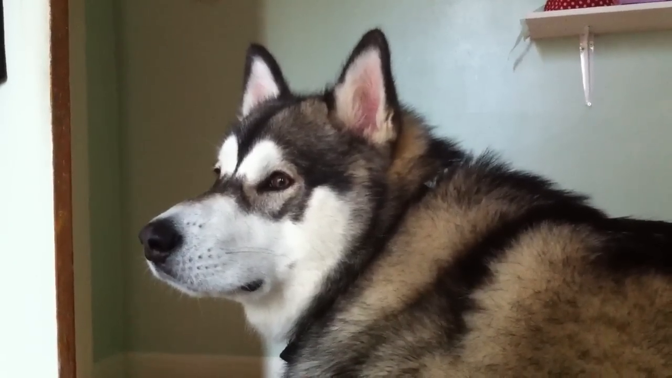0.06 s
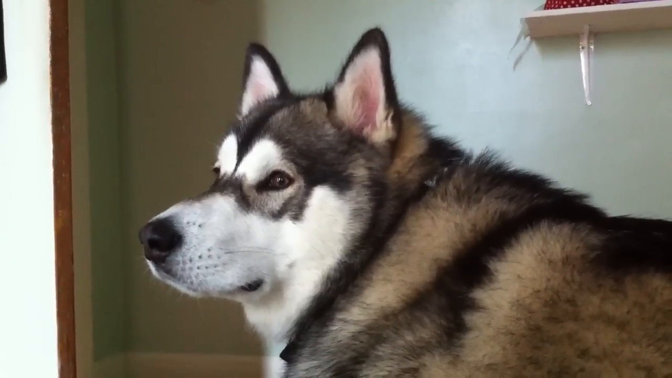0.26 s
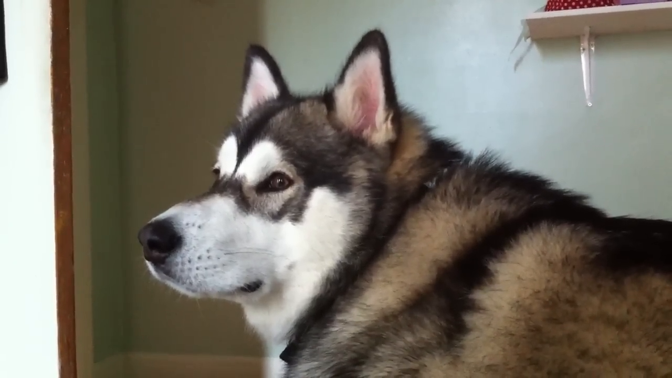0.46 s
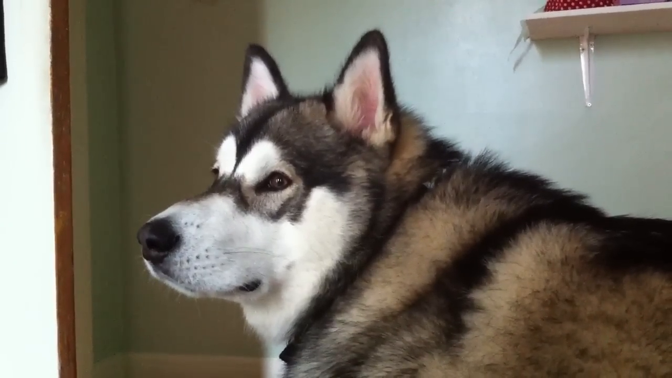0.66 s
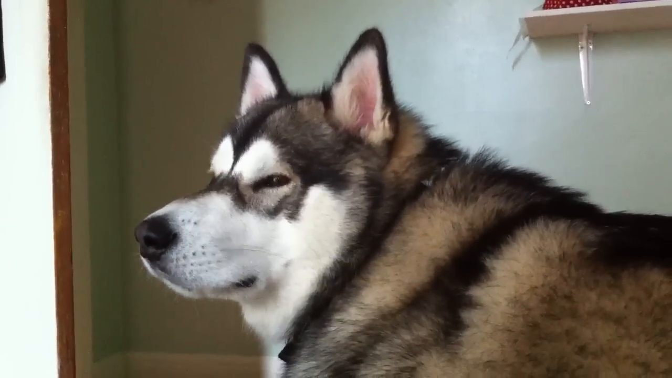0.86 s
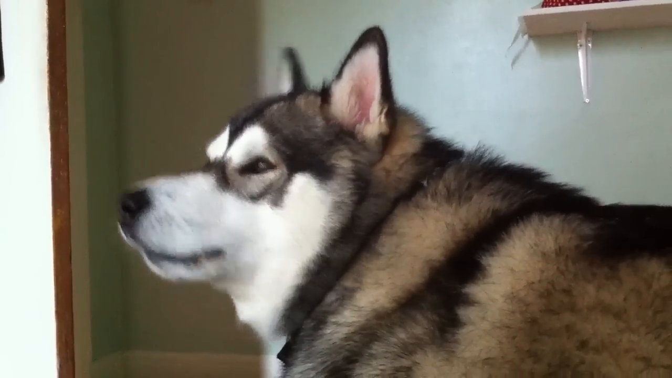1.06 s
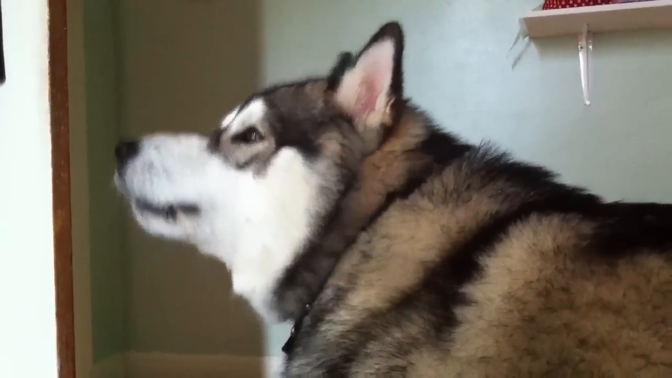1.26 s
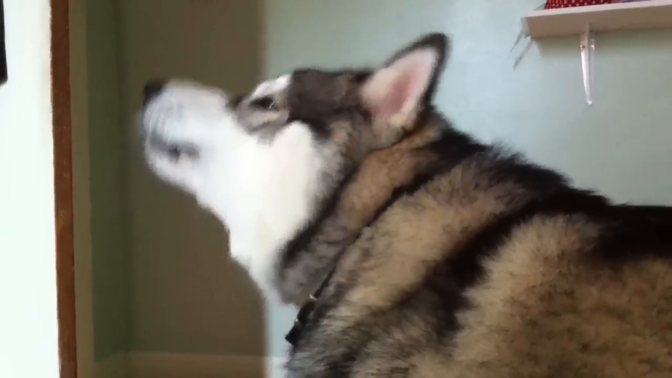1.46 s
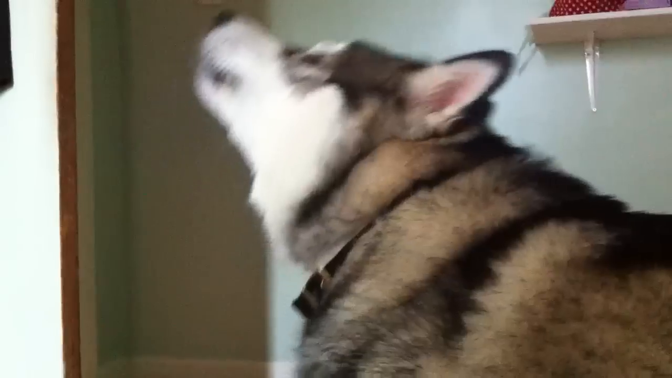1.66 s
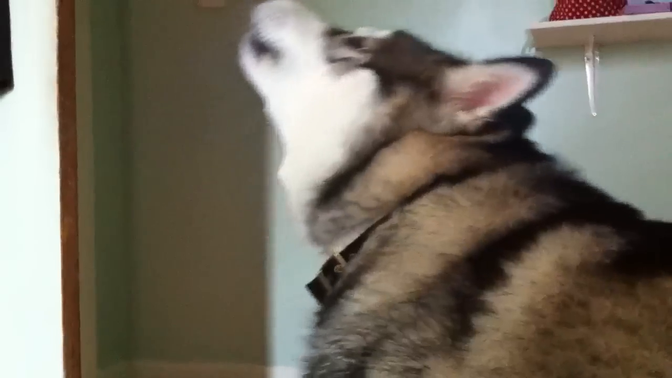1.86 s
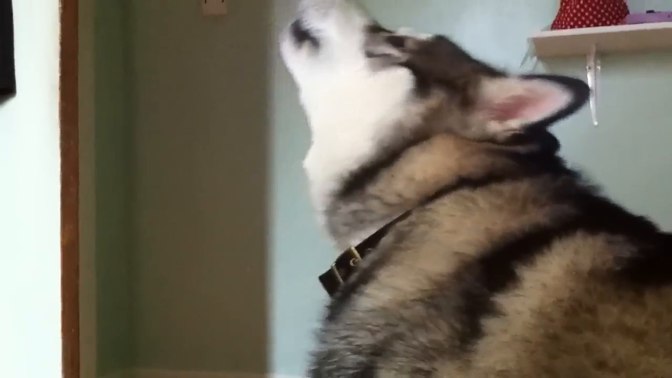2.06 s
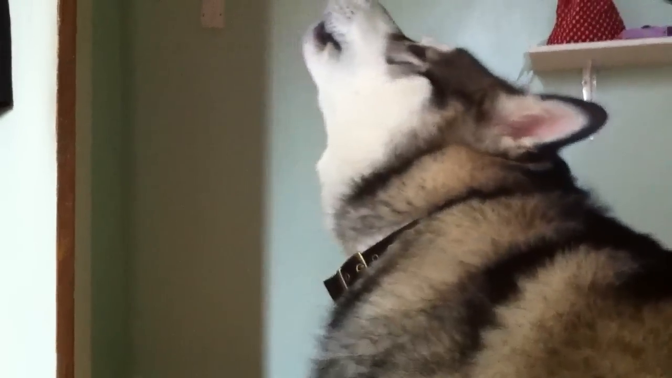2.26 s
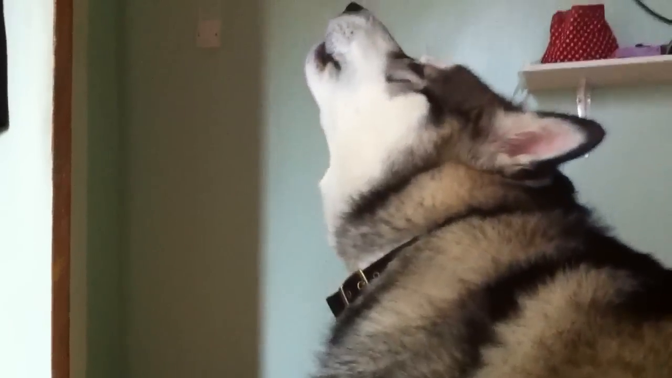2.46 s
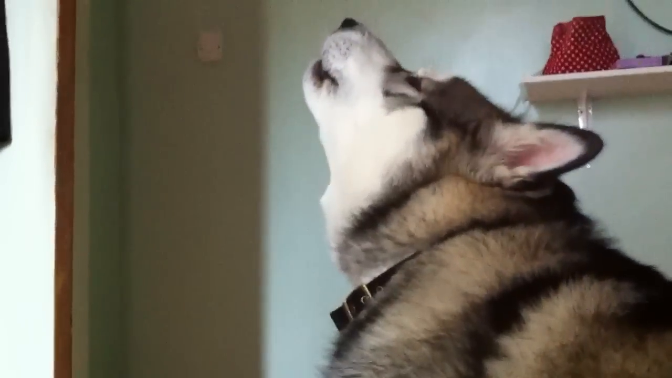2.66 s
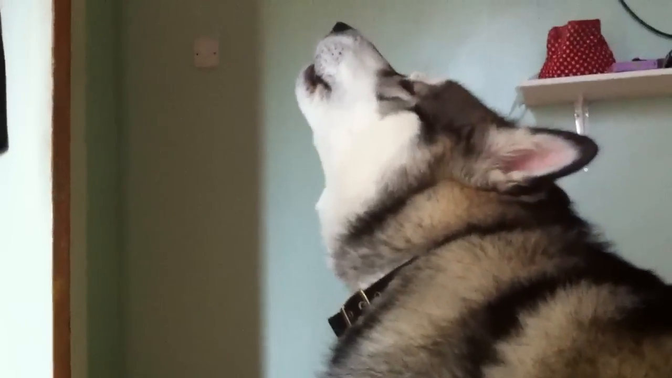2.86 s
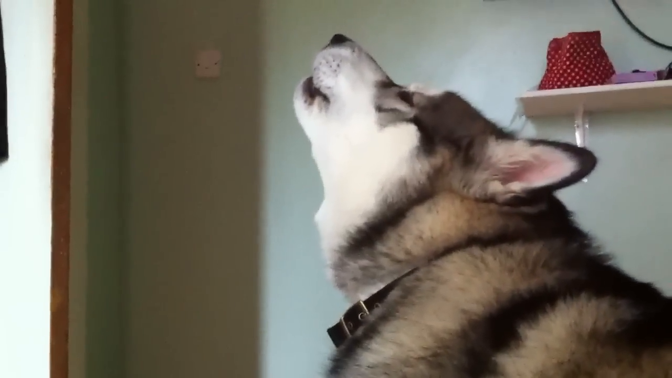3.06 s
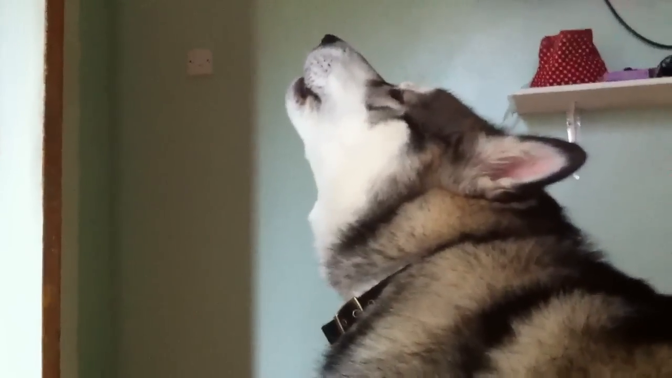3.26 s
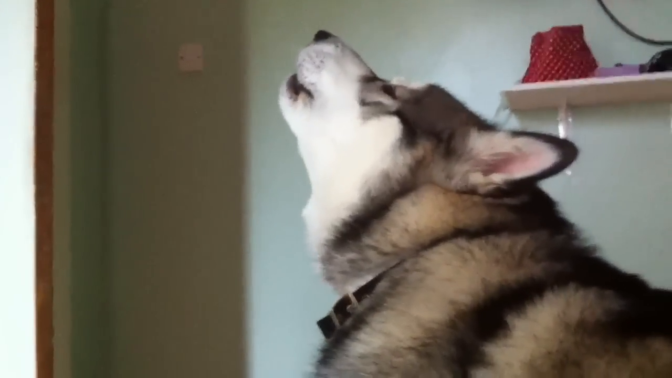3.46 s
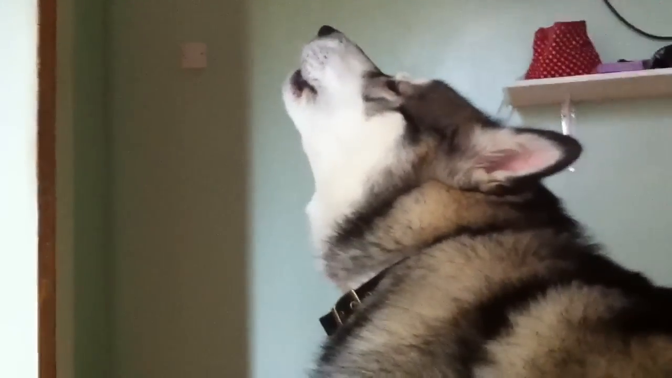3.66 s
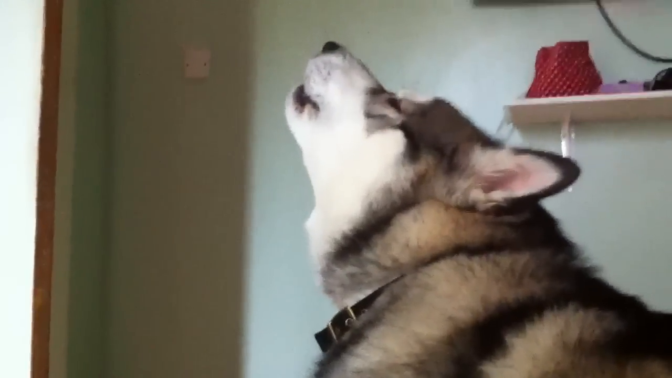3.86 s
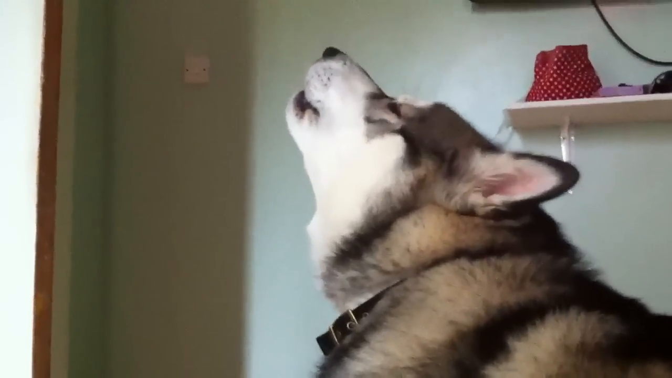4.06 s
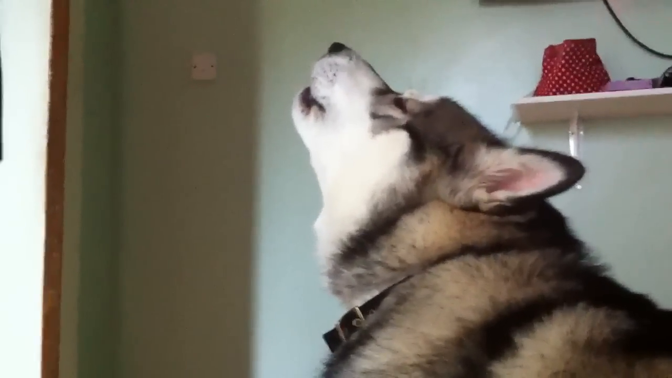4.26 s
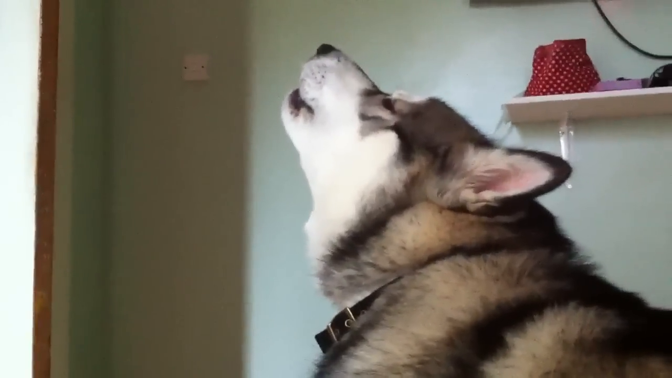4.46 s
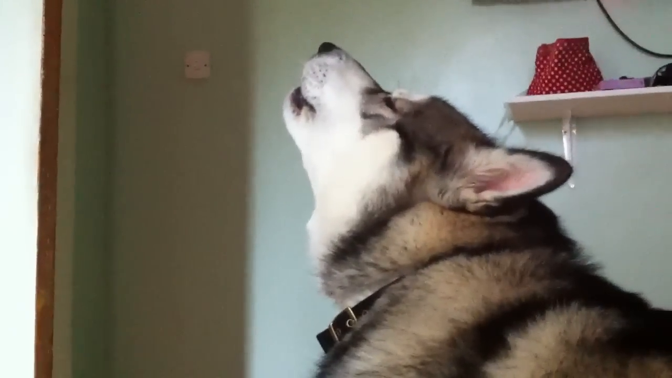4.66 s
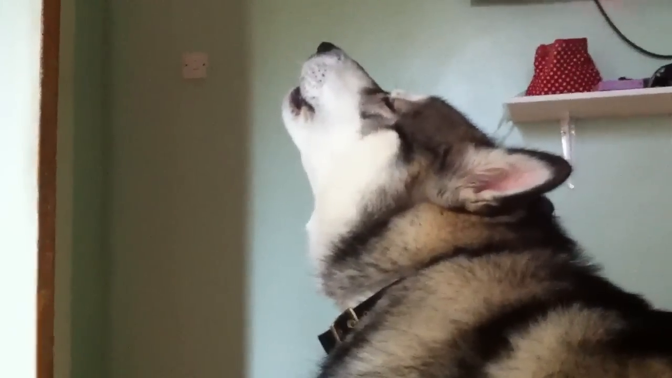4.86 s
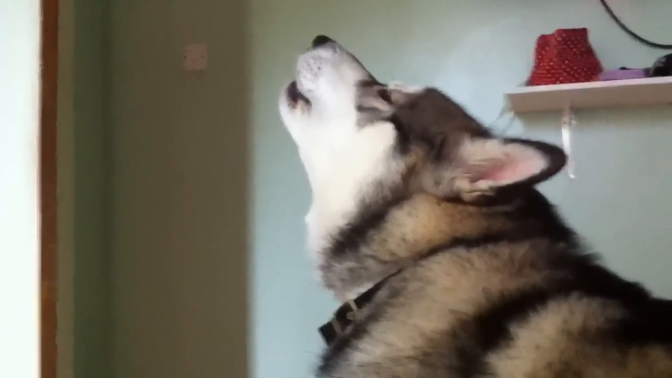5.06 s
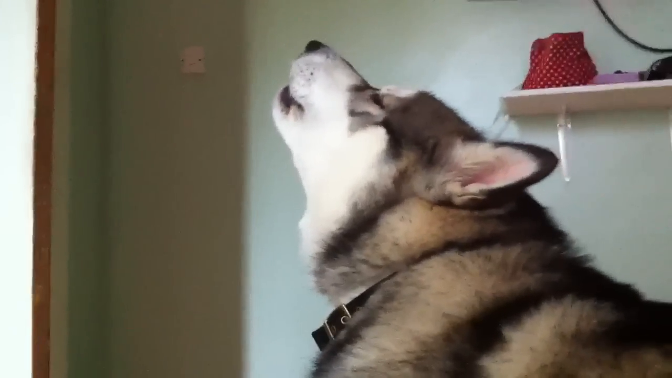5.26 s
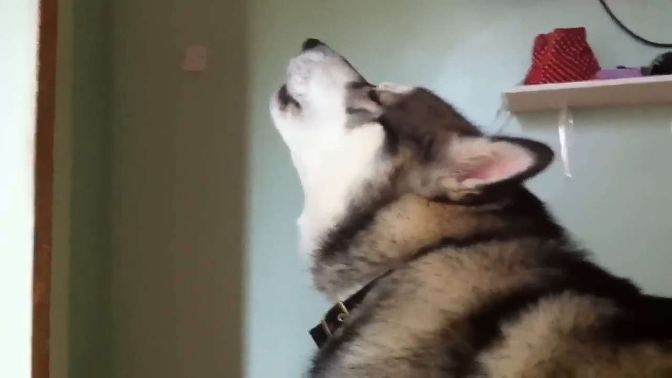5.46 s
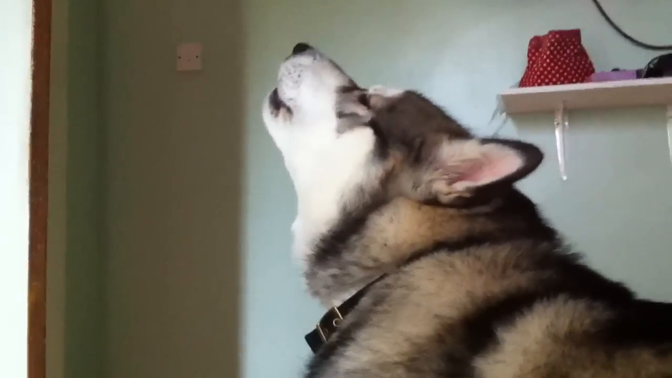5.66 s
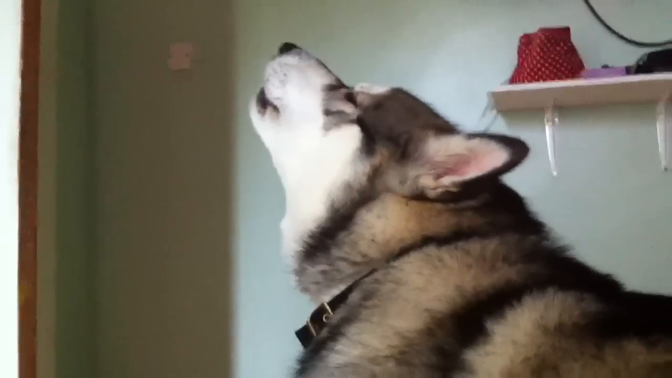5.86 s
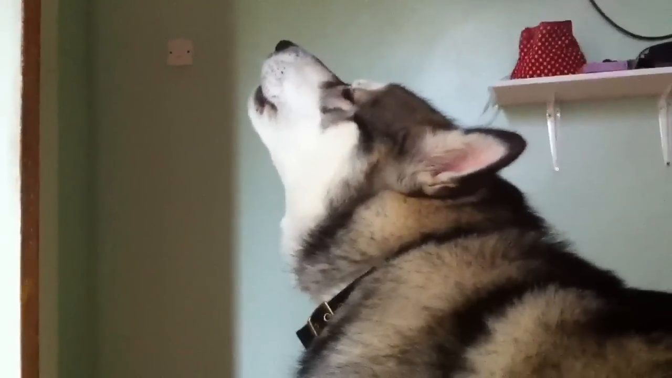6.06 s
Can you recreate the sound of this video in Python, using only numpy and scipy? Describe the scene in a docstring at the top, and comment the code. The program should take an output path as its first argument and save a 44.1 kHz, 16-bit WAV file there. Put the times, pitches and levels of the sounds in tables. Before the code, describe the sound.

Close by in a small room, a big dog chuffs softly and howls once, high at first, then lower and hoarse, sinking away.

```python
"""A large dog, close by in a small, softly humming room, snuffles and gives a low chuff: four slack flaps
of the throat. It lifts its head and howls once. The howl starts high and pure, as its vocal folds swing
evenly, then turns breathy and cracks down to a lower note. There the folds repeat only every third cycle
and keep breaking into a rasp, while the dog presses ever harder and its wet mouth clicks faintly.
At last the voice clears, sinks and fades away."""
import sys
import numpy as np
from scipy import signal
from scipy.fft import rfft, irfft, next_fast_len
from scipy.io import wavfile
from scipy.ndimage import uniform_filter1d

SR = 44100
rng = np.random.default_rng(int(sys.argv[2]) if len(sys.argv) > 2 else 0)


def store_wav(level_fs):
    """Save 16-bit WAV to argv[1]."""
    pcm = np.round(np.clip(np.atleast_2d(level_fs), -1, 1) * 32767)
    wavfile.write(sys.argv[1], SR, pcm.T.astype(np.int16))


N = 269451
TIME = np.arange(N) / SR

# the howl starts high and swells: t/s, pitch/Hz, level/dB
HIGH_NOTE = [(1.482, 566, -32.5), (1.507, 633, -23), (1.541, 602.6, -22), (1.591, 613.9, -21.5),
             (1.656, 589.4, -21.5), (1.736, 576.2, -18), (1.886, 555.6, -15.5), (2.05, 551.8, -14),
             (2.365, 567.1, -8.5), (2.424, 563.5, -9), (2.469, 569.3, -10.5)]
# after the break it settles on a lower note: t/s, pitch/Hz, level/dB
LOW_NOTE = [(2.49, 468, -11), (2.57, 456, -11.5), (2.615, 428, -11), (2.66, 423, -15.5), (2.75, 421, -14.5),
            (2.85, 414, -10), (2.94, 409.5, -11.5), (3.7, 409, -11), (4.2, 405.5, -9.7), (4.52, 405.5, -10)]
# then it sinks away: t/s, pitch/Hz, level/dB
FALLING_NOTE = [(4.555, 406.5, -10.5), (4.59, 414.1, -9.5), (4.929, 392.9, -11), (5.263, 389.1, -14),
                (5.333, 379.6, -16.5), (5.647, 366.5, -18.5), (5.712, 354.3, -24.5), (5.907, 348.8, -22.5),
                (5.971, 338, -32), (6.026, 336.4, -35), (6.096, 331.3, -40)]
# tone of each stage, relative to the effort: start/s, harmonics 2 to 5/dB (one each), overtones/dB
TIMBRE = [(1.47, -16, -34, -45, -54, -36), (1.55, -19.5, -26, -50.5, -45.5, -39),
          (2.12, -30, -34, -46.5, -43.5, -40.5), (2.49, -17, -34.5, -46.5, -47.5, -45),
          (2.62, -16.5, -27, -39, -39.5, -39), (4.55, -16.5, -26, -37.5, -43.5, -37),
          (5.31, -22, -14, -34, -39.5, -34.5), (5.66, -19, -23, -47.5, -42.5, -41),
          (5.95, -12.5, -32, -42, -31, -33)]
# rasp of the folds and air rushing past them, relative to the effort: start/s, rasp/dB, air/dB
TEXTURE = [(1.47, -29.5, -34.5), (1.6, -43, -49), (2.07, -32, -40), (2.49, -19, -40), (2.64, -25, -38),
           (2.99, -17, -41.5), (3.77, -20.5, -43.5), (3.92, -34, -43), (4.58, -44, -49), (5.32, -45, -55)]
# spells in which the folds repeat every second cycle: start/s, end/s, level/dB
DOUBLING = [(2.32, 2.48, -34.5), (2.98, 3.85, -29.5)]
# spell in which they repeat every third cycle: start/s, end/s, level/dB
TRIPLING = [(2.62, 4.57, -10.5)]
# extra tones in that spell: multiple of a third of the pitch, relative level/dB
SIDE_TONES = [(1, -52), (2, -24.5), (4, -32), (5, -19), (7, -28.5), (8, -16.5), (10, -47.5), (11, -36),
              (13, -51), (14, -31.5)]
# cracks, where the folds lose their rhythm: t/s, level/dB
CRACKS = [(2.493, -13), (2.522, -12.5), (2.54, -16), (2.565, -18), (2.585, -12.5), (2.613, -17),
          (3.04, -15.5), (3.103, -15), (3.201, -18), (3.272, -19.5), (3.341, -13), (3.417, -19),
          (3.455, -19), (3.522, -13), (3.577, -16.5), (3.6, -13), (3.661, -15.5), (3.748, -14)]
# a crack rings the two lowest resonances of the mouth: f/Hz, relative level/dB
CRACK_COLOUR = [(60, -64.5), (130, -26), (220, -30.5), (290, -4), (460, 4), (620, 3), (790, -9.5),
                (1020, -3.5), (1200, -33), (1600, -40.5), (2030, -22), (2500, -61.5), (5000, -65.5)]
# the throat as the rasp rings it: f/Hz, relative level/dB
RASP_COLOUR = [(70, -58), (135, -25), (220, -28), (280, -8.5), (450, -3.5), (620, -5.5), (780, -13),
               (1060, -8.5), (1200, -20.5), (1500, -28), (2030, -19), (2450, -60.5), (2950, -42.5),
               (3220, -16.5), (3550, -43), (5000, -59)]
# resonances of throat and muzzle: f/Hz, width/Hz, gain when narrow/dB, gain when open/dB
THROAT = [(2090, 130, -7.5, 3.5), (2740, 140, 1.5, -18.5), (3181, 220, -12, 0.5), (4800, 300, -8.5, -33.5),
          (5230, 450, -14.5, -14), (6084, 490, -4, -6.5), (6372, 41, -9, 5.5), (8250, 190, -10, -15),
          (9270, 200, -6.5, -28.5), (13200, 6800, -25, -23.5)]
# the throat settles from narrow to open: t/s, opening from 0 to 1
OPENING = [(2.48, 0.02), (2.55, 0.3), (2.93, 0.5), (3.02, 0.99)]
# air through the narrow throat: f/Hz, relative level/dB
NARROW_AIR_COLOUR = [(80, -25.5), (900, -6.5), (2050, 7.5), (2550, -4.5), (3400, 2.5), (3900, -4.5),
                     (4600, -6), (5700, -9.5), (6150, 3.5), (7500, -14), (8500, 3.5), (9900, -11.5),
                     (13000, -10), (15700, -22)]
# air through the open throat: f/Hz, relative level/dB
OPEN_AIR_COLOUR = [(80, -23), (1200, 6.5), (2050, 14.5), (2550, -3.5), (2950, -0.5), (3200, 12.5),
                   (3700, -4.5), (5100, 1), (5700, -10), (6250, 7), (7400, -9.5), (8400, 5.5),
                   (9900, -10.5), (14000, 5.5), (15800, -8)]
# flaps of the throat in the chuff: t/s, level/dB
CHUFF_FLAPS = [(1.129, -30), (1.145, -35), (1.158, -29.5), (1.173, -33)]
# the low thud of those flaps: f/Hz, relative level/dB
CHUFF_COLOUR = [(40, -42.5), (85, -23.5), (150, 1), (260, 1.5), (470, 1.5), (690, -21), (1020, -1.5),
                (1250, -15), (2000, -24), (3800, -22), (6000, -33), (6900, -33), (7600, -37), (15000, -39)]
# puffs through the nose around the chuff: start/s, end/s, level/dB
SNUFFLES = [(.965, .99, -65), (1.04, 1.2, -57), (1.32, 1.36, -65.5)]
# the hiss of those puffs: f/Hz, relative level/dB
SNUFFLE_COLOUR = [(59, -59), (100, -27), (297, -1.5), (831, -1.5), (1290, -10), (1430, -3), (2180, -15),
                  (3390, -10), (5370, -15.5), (15000, -18)]
# wet clicks of tongue and lips: t/s, level/dB
CLICKS = [(1.057, -44), (3.082, -39), (3.28, -39), (4.078, -50), (4.761, -42.5)]
# the bright snap of those clicks: f/Hz, relative level/dB
CLICK_COLOUR = [(1000, -25), (5000, -15.5), (9000, -2), (12000, 3), (15500, -6)]
# echoes from the nearest surfaces: delay/ms, gain
ECHOES = [(5.88, 0.34), (7.08, 0.17), (7.95, 0.41), (11.83, 0.22), (17.0, 0.2), (20.89, 0.19)]
# the room's steady hum and hiss: f/Hz, relative level/dB
ROOM_COLOUR = [(18, -76.5), (30, -36.5), (85, -37), (140, -15.5), (182, -16.5), (219, -2), (249, -17),
               (389, -18.5), (2360, -26), (3230, -27), (5590, -27), (6210, -30.5), (7650, -29.5),
               (12300, -30.5), (15500, -26)]

BREAK_S = 2.495  # the voice drops to its lower note
TOP_HZ = 15750  # upper edge of the sound
RING_DB, RING_PRESS_DB = -15, 18  # mouth's ring near 1 and 2 kHz when slack, and its rise at full push
FIFTH_PRESS_DB, TREBLE_PRESS_DB = 7, 5  # rise of the fifth harmonic and the overtones at full push
DULL_FROM_S, DULL_DB_PER_S = 4.86, 24  # the treble fades as the howl runs out
FLUTTER_DB, FLUTTER_PER_S = 2, 12  # the low harmonics waver in strength, each on its own


def howl(jitter=0.00096, rough_jitter=0.16, crack_kick=.03, shimmer=7.1, effort_s=0.3, low_cut_hz=115):
    """One long call, all riding on the swing of the vocal folds. Returns its body and its treble."""
    pitch, level_db = curves([*HIGH_NOTE, *LOW_NOTE, *FALLING_NOTE])
    effort_db = uniform_filter1d(level_db, int(effort_s * SR))  # effort is the smoothed level
    *harmonics_db, overtones_db = effort_db + np.array(stages(TIMBRE, glide_s=.045))
    rasp_db, air_db = effort_db + np.array(stages(TEXTURE, glide_s=.053))
    press = pressure()
    harmonics_db[-1] += FIFTH_PRESS_DB * press
    side_gain = spells(TRIPLING, attack_s=0.026, release_s=0.027)
    opening = np.clip(curves(OPENING)[0], 0, 1)
    hoarse = undb(rasp_db)
    burst, tone_share = cracks()
    roughness = np.hypot(hoarse, burst)
    # rougher folds hold their pitch less well, and each crack jerks it upward
    wobble = (jitter + rough_jitter * roughness) * wander(160)
    hz = pitch * (1 + wobble + crack_kick * (1 - tone_share))
    phase = 2 * np.pi * np.cumsum(hz) / SR
    # their swing wavers too, and falters more than it overshoots
    swing = tone_share * (1 + shimmer * hoarse * np.minimum(wander(70), .5))
    tone = undb(level_db) * np.sin(phase)
    for k, db in enumerate(harmonics_db, 2):
        tone += undb(db + FLUTTER_DB * wander(FLUTTER_PER_S)) * echo_gain(k * pitch) * np.sin(k * phase)
    growl = undertones(phase, side_gain, RING_DB + RING_PRESS_DB * press, roughness)
    body = swing * (np.sqrt(2) * tone + growl)
    body += hoarse * rasp(phase, RASP_COLOUR) + burst * rasp(phase, CRACK_COLOUR)
    # the mouth is too small to send out bass
    body = signal.sosfilt(signal.butter(3, low_cut_hz, "high", fs=SR, output="sos"), body)
    tripled = side_gain / side_gain.max()
    treble = undb(overtones_db + TREBLE_PRESS_DB * press) * overtones(phase, hz, tripled, opening, press)
    treble += undb(air_db) * breath(phase, opening, tripled)
    dulling = undb(-DULL_DB_PER_S * np.maximum(TIME - DULL_FROM_S, 0))
    onset = np.interp(TIME, [1.472, 1.492], [0, 1])
    return onset * body, onset * dulling * treble


def pressure(start_s=2.65, full_s=4.05, end_s=4.53, release_s=.06):
    """The push behind the voice, from 0 to 1: the dog presses ever harder, holds, then lets go."""
    return np.interp(TIME, [start_s, full_s, end_s, end_s + release_s], [0, 1, 1, 0])


def undertones(phase, side_gain, ring_db, roughness, slip=0.079, rough_slip=7.2):
    """Folds that repeat every second or third cycle add tones below and between the harmonics."""
    # after the break, half the pitch lies too low to carry
    halves = undb(-8.5) * (TIME < BREAK_S) * np.sin(phase / 2) + np.sin(1.5 * phase)
    # the rougher the voice, the more the three-cycle pattern slips
    slow_phase = (phase + (slip + rough_slip * roughness) * wander(45)) / 3
    thirds = 0
    for multiple, db in SIDE_TONES:
        boost_db = ring_db * (multiple in (8, 14))  # these two lie where the mouth rings
        thirds += undb(db + boost_db) * np.sin(multiple * slow_phase + rng.uniform(0, 2 * np.pi))
    return np.sqrt(2) * (spells(DOUBLING, attack_s=0.016, release_s=.02) * halves + side_gain * thirds)


def cracks(rise_s=0.0083, heal_s=.016, tone_loss=.75, dip_length_share=.65):
    """The folds lose their rhythm fast and regain it more slowly. Returns rasp gain and the tone left."""
    burst, tone_share = 0, 1
    for s, db in CRACKS:
        age = (TIME - s) / np.where(TIME < s, rise_s, heal_s)
        burst += undb(db) * np.exp(-age ** 2)
        tone_share *= 1 - tone_loss * np.exp(-(age / dip_length_share) ** 2)
    return burst, tone_share


def rasp(phase, points, scatter_cycles=.22, spread_db=5.5):
    """The folds clap shut with uneven timing and strength, and each clap rings the throat."""
    cycles = np.arange(int(phase[-1] / (2 * np.pi)))
    timing, strength = rng.standard_normal((len(cycles), 2)).T
    clap_at = np.interp(2 * np.pi * (cycles + scatter_cycles * timing), phase, np.arange(N))
    claps = np.bincount(clap_at.astype(int), undb(spread_db * strength), N)
    # only what strays from the even rhythm is rough
    even = 2 * np.mean(claps * np.cos(phase)) * np.cos(phase) + claps.mean()
    ring = colour(claps - even, points)
    # the folds can only swing so far, which evens out the loudness
    power = uniform_filter1d(uniform_filter1d(ring ** 2, size=400), size=400)
    return unit(ring / np.sqrt(power + 0.069))


def overtones(phase, hz, tripled, opening, press, side_db=-3, flutter_db=3):
    """The throat shapes harmonics 6 to 37; the three-cycle pattern adds a side tone under each."""
    sound, power = 0, 1e-9
    for k in range(6, 38):
        gain = throat(k * hz, opening) * whistle(k * hz, press)
        sound += gain * undb(flutter_db * wander(16)) * np.sin(k * phase + rng.uniform(0, 2 * np.pi))
        below = k - 1 / 3
        side_gain = tripled * undb(side_db) * throat(below * hz, opening) * whistle(below * hz, press)
        sound += side_gain * np.sin(below * phase + rng.uniform(0, 2 * np.pi))
        power += (gain ** 2 + side_gain ** 2) / 2
    return sound / np.sqrt(power)


def throat(hz, opening):
    """How well throat and muzzle pass a tone at hz, as they move from narrow to open."""
    grid = np.linspace(0, SR / 2, num=2048)
    narrow, wide = 0, 0
    for centre_hz, width_hz, narrow_db, open_db in THROAT:
        peak = (grid < TOP_HZ) / (1 + (2 * (grid - centre_hz) / width_hz) ** 2)
        narrow += undb(narrow_db) * peak
        wide += undb(open_db) * peak
    return (1 - opening) * np.interp(hz, grid, narrow) + opening * np.interp(hz, grid, wide)


def whistle(hz, press, centre_hz=6400, half_width_hz=450, boost_db=5):
    """Extra gain at hz from a throat resonance that sharpens under pressure."""
    return undb(boost_db * press / (1 + ((hz - centre_hz) / half_width_hz) ** 2))


def breath(phase, opening, tripled, pulse=0.5, throb=0.25):
    """Air escapes once a cycle, and throbs with the slower of the two folds."""
    narrow = undb(5.5) * (1 - opening) * noise(NARROW_AIR_COLOUR)
    wide = undb(4.0) * opening * noise(OPEN_AIR_COLOUR)
    slow_fold = np.cos(phase * 2 / 3)
    return (narrow + wide) * (1 + pulse * np.cos(phase) + throb * tripled * slow_fold)


def chuff(ring_s=0.0029, tail_s=0.021, tail_db=-11):
    """Four slack flaps of the throat, each trailing a puff of air."""
    puffs = np.zeros(N)
    for s, db in CHUFF_FLAPS:
        age = np.maximum(TIME - s, 0)
        puffs += undb(db) * (TIME > s) * (np.exp(-age / ring_s) + undb(tail_db) * np.exp(-age / tail_s))
    return colour(puffs * rng.standard_normal(N), CHUFF_COLOUR) * np.sqrt(np.mean(puffs ** 2))


def snuffle():
    """Short puffs of air hiss through the nose."""
    return spells(SNUFFLES, attack_s=0.022, release_s=.02) * noise(SNUFFLE_COLOUR)


def clicks(ring_s=.002):
    """Films of saliva snap in the open mouth."""
    snaps = sum(undb(db) * (TIME > s) * np.exp(-np.abs(TIME - s) / ring_s) for s, db in CLICKS)
    return snaps * noise(CLICK_COLOUR)


def echo_gain(hz):
    """Near echoes strengthen or weaken a harmonic as it glides."""
    return np.abs(1 + sum(gain * np.exp(-2j * np.pi * hz * ms / 1000) for ms, gain in ECHOES))


def room(x, wet_db, fade_s=0.33):
    """Near walls add a short wash of echoes that falls by 60 dB in fade_s."""
    age = TIME[:SR // 2]
    tail = rng.standard_normal(len(age)) * np.exp(-np.log(1000) * age / fade_s) * (age > .003)
    return x + undb(wet_db) * signal.fftconvolve(x, tail / np.linalg.norm(tail))[:N]


def room_tone(level_db=-64):
    """A faint, steady hum and hiss fills the room."""
    return undb(level_db) * noise(ROOM_COLOUR)


def undb(db):
    """Turn decibels into a gain."""
    return 10 ** (np.asarray(db) / 20)


def unit(x):
    """Scale to an average power of 1."""
    return x / np.sqrt(np.mean(x ** 2))


def curves(rows):
    """Join the rows with straight lines: one curve over time per column."""
    times, *columns = np.transpose(rows)
    return [np.interp(TIME, times, column) for column in columns]


def stages(rows, glide_s):
    """Hold each row until the next, then glide to it: one curve per column."""
    starts, *columns = np.transpose(rows)
    row_now = np.maximum(np.searchsorted(starts, TIME) - 1, 0)
    return [uniform_filter1d(column[row_now], int(glide_s * SR)) for column in columns]


def spells(rows, attack_s, release_s):
    """A gain that rises before each start, holds, and dies away after each end."""
    gain = 0
    for start, end, db in rows:
        rise = np.clip(1 + (TIME - start) / attack_s, 0, 1)
        gain += undb(db) * rise * np.exp(-np.maximum(TIME - end, 0) / release_s)
    return gain


def colour(x, points):
    """Filter x by a curve of (f/Hz, level/dB) points, then scale it to a power of 1."""
    hz, db = np.transpose(points)
    size = 2 * next_fast_len(N)
    grid = np.maximum(np.fft.rfftfreq(size, 1 / SR), 1)
    gain = undb(np.interp(np.log(grid), np.log(hz), db))
    # folding the cepstrum makes the filter ring after a pulse, never before it
    cepstrum = irfft(np.log(gain))
    cepstrum[1:size // 2] *= 2
    cepstrum[size // 2 + 1:] = 0
    return unit(irfft(rfft(x, size) * np.exp(rfft(cepstrum)))[:N])


def noise(points):
    """Steady noise with the given colour."""
    return colour(rng.standard_normal(N), points)


def wander(per_s):
    """A random curve of typical size 1 that heads for a new value per_s times a second."""
    step = max(int(SR / per_s), 1)
    targets = np.repeat(rng.standard_normal(N // step + 1), step)
    return unit(uniform_filter1d(targets, step)[:N])


def scene():
    """The dog in its small room, in one channel."""
    body, treble = howl()
    dog = room(body, wet_db=-27)
    # the raised muzzle beams its treble at the ceiling, so more of that arrives as echo
    dog += undb(-3.5) * room(treble + clicks(), wet_db=-0.5)
    dog += room(chuff() + snuffle(), wet_db=-14)
    return (dog + room_tone())[None]


def record(dry):
    """Cut off the very highest treble."""
    return signal.sosfilt(signal.ellip(10, .1, 80, TOP_HZ, fs=SR, output="sos"), dry)


dry = scene()
out = record(dry)
store_wav(out)
```